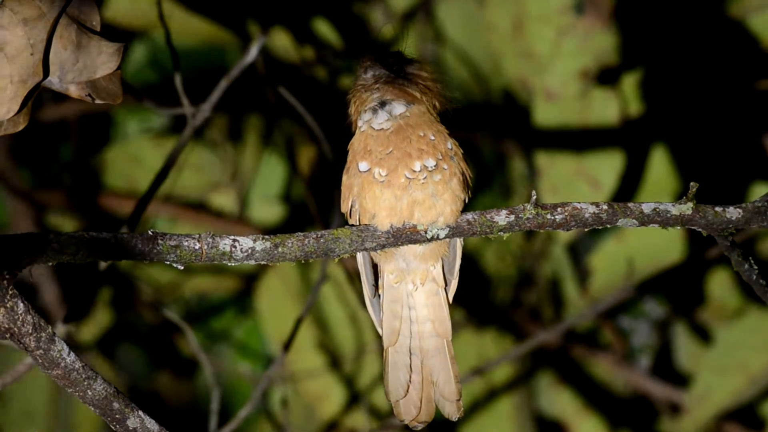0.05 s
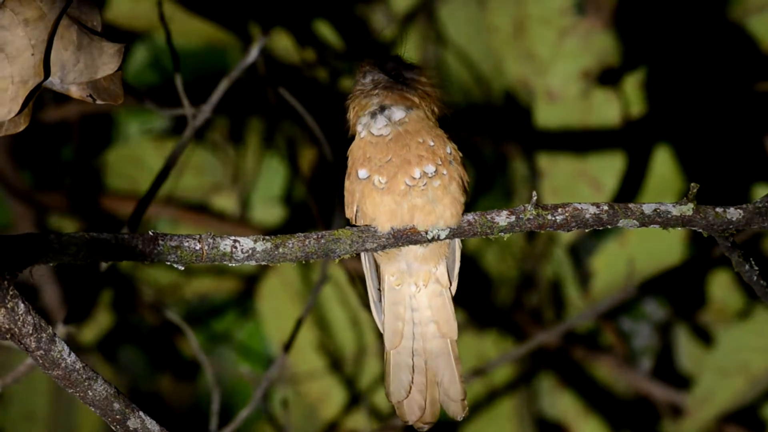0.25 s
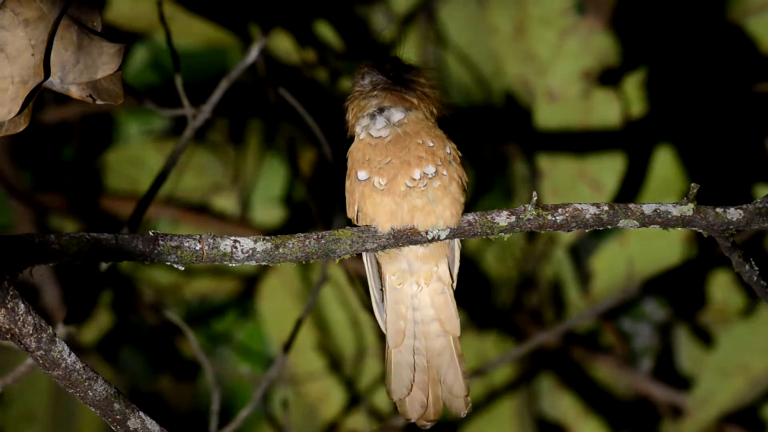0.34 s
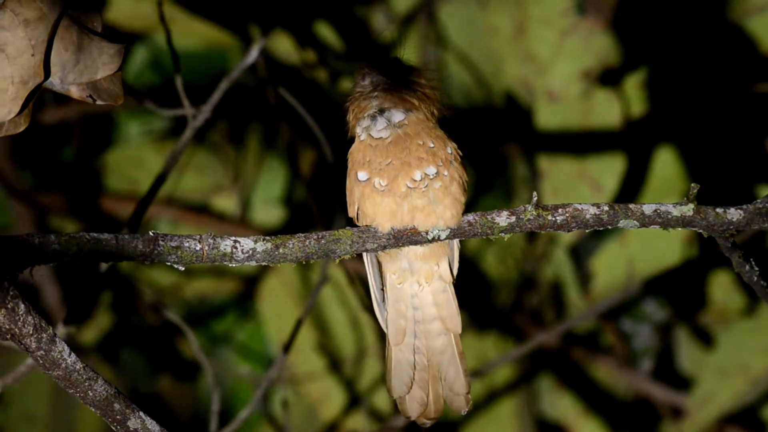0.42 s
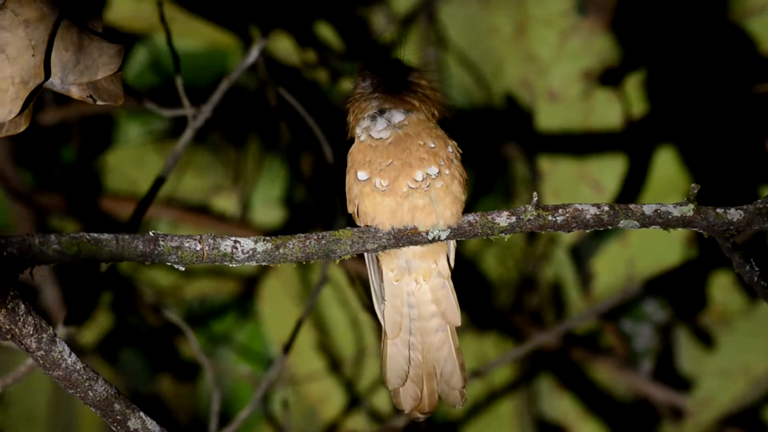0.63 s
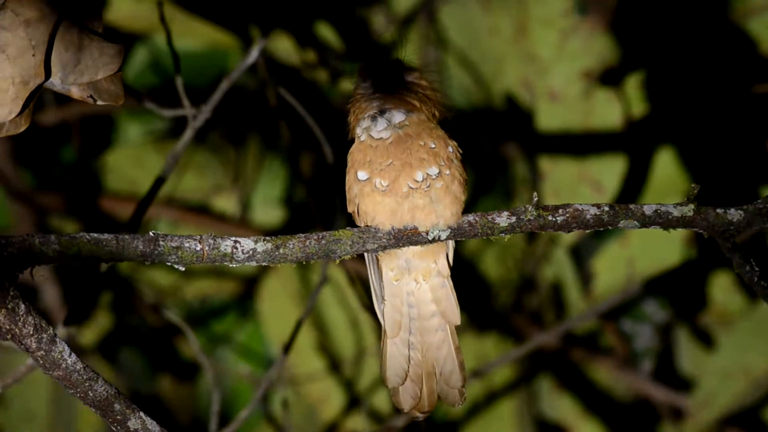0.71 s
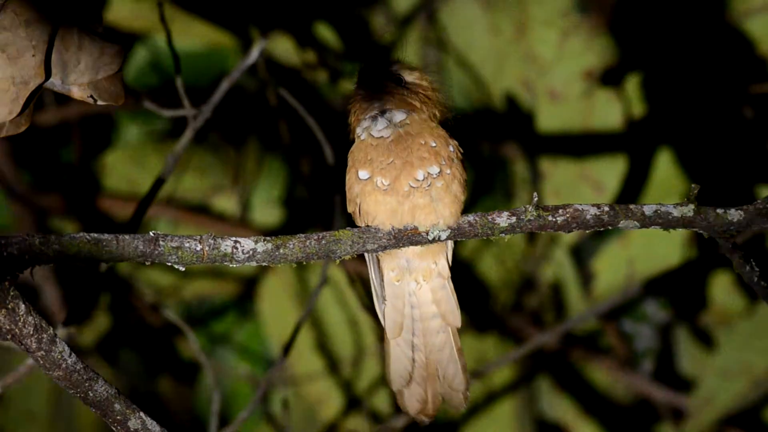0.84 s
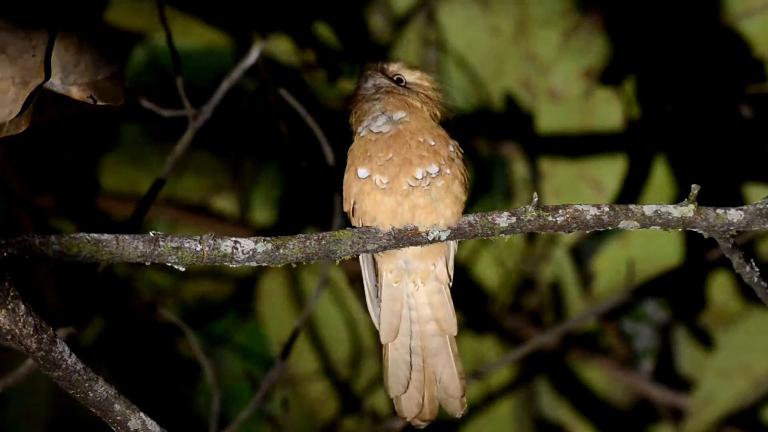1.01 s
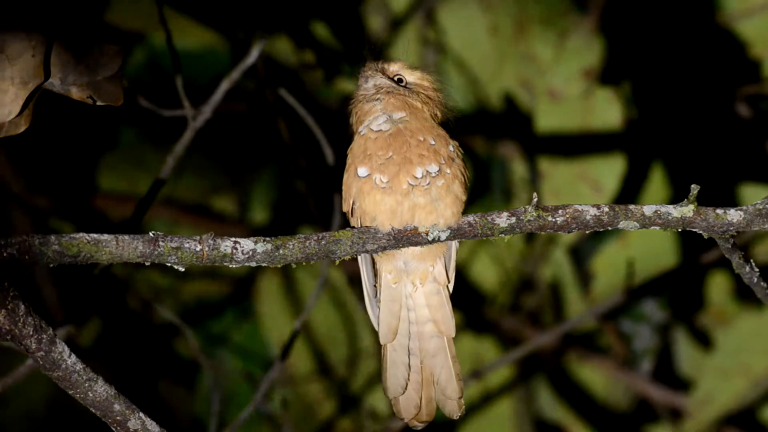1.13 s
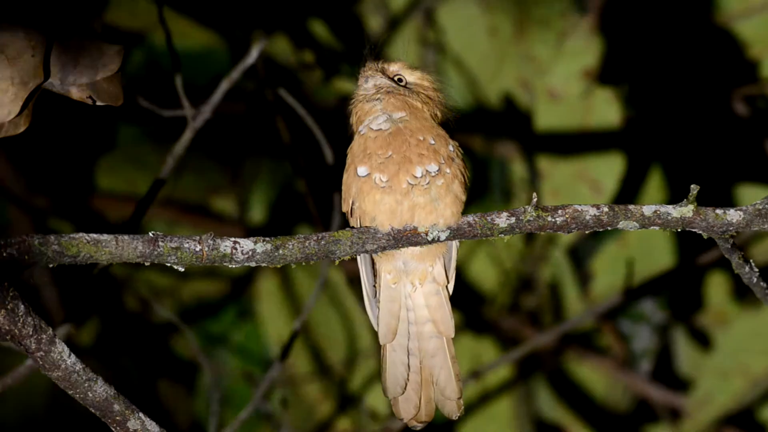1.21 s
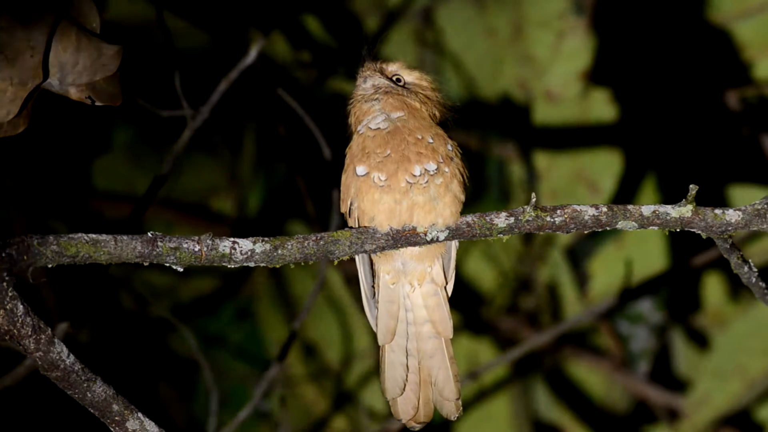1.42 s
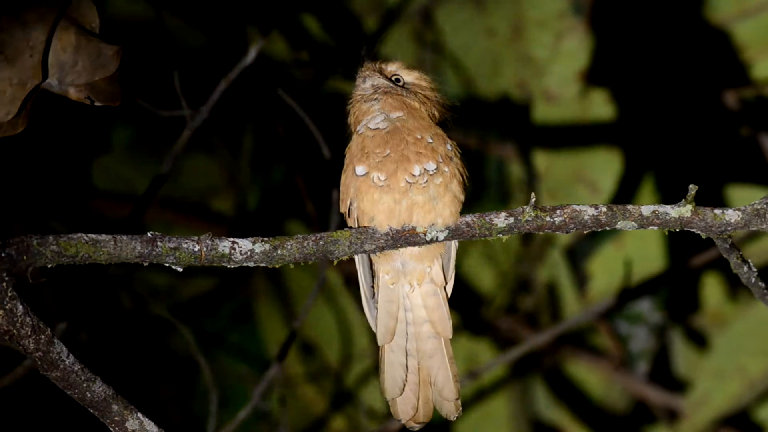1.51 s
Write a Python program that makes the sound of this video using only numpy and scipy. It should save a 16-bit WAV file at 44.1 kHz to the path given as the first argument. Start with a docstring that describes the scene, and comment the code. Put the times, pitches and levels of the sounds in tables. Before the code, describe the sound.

A bird whistles one rising note as a camera shutter clicks, with faint crickets behind.

```python
"""Frogmouth and camera in a night forest

A frogmouth whistles one rising, fluttering note; the trees answer briefly. A camera close by
fires: mirror and shutter clack and rattle in its hollow body. Crickets trill at four pitches
with their wings, a katydid buzzes very high, and leaves tick and rustle over a steady hush."""
import sys
import numpy as np
from scipy import signal
from scipy.fft import rfft, irfft, next_fast_len
from scipy.io import wavfile
from scipy.ndimage import uniform_filter1d, map_coordinates

SR = 44100
rng = np.random.default_rng(int(sys.argv[2]) if len(sys.argv) > 2 else 0)


def file_out(sig):
    """Save sig as 16-bit WAV at sys.argv[1]."""
    # one column per channel
    cols = np.atleast_2d(sig).T
    # limit, then scale
    lim = np.clip(cols, -1, 1)
    pcm = np.round(lim * 32767).astype(np.int16)
    wavfile.write(sys.argv[1], SR, pcm)


N = 68355
T = np.arange(N) / SR


def amp(db):
    """dB to gain."""
    return 10 ** (np.asarray(db) / 20)


def unit(x):
    """Scale to rms 1."""
    return x / np.sqrt(np.mean(x ** 2) + 1e-20)


def db_at(spectrum, hz):
    """Interpolate (frequency [Hz], level [dB]) rows on a log frequency axis."""
    knots_hz, db = np.transpose(spectrum)
    return np.interp(np.log(hz + 1), np.log(knots_hz + 1), db)


def curves(rows):
    """One per-sample curve for each column after the time."""
    times_s, *columns = np.transpose(rows)
    return [np.interp(T, times_s, column) for column in columns]


def wobble(knots_per_s):
    """Smooth random curve, rms near 1."""
    return map_coordinates(rng.standard_normal(int(N * knots_per_s / SR) + 4), [T * knots_per_s])


def filtered(x, response):
    """Apply a complex frequency response."""
    size = next_fast_len(N + SR // 2)
    return irfft(rfft(x, size) * response(np.fft.rfftfreq(size, 1 / SR)), size)[..., :N]


def coloured(x, spectrum):
    """Filter by (frequency [Hz], gain [dB]) rows."""
    return filtered(x, lambda hz: amp(db_at(spectrum, hz)))


def resonance(hz, centre_hz, width_hz):
    """Band-pass response of one mode."""
    return 1j * hz * width_hz / (centre_hz ** 2 - hz ** 2 + 1j * hz * width_hz)


def window(start_s, end_s, edge_s):
    """Gate with linear edges."""
    return np.clip(np.minimum(T - start_s, end_s - T) / edge_s, 0, 1)


def burst(start_s, db, t60_s, rise_s):
    """Noise with a fast rise and exponential decay."""
    age_s = np.maximum(T - start_s, 0)
    return amp(db - 60 * age_s / t60_s) * (1 - np.exp(-age_s / rise_s)) * rng.standard_normal(N)


def hisses(spans, spectrum, edge_s):
    """Stretches of uneven coloured noise."""
    noise = unit(coloured(amp(2.7 * wobble(100)) * rng.standard_normal(N), spectrum))
    return noise * sum(amp(db) * window(a, b, edge_s) for a, b, db in spans)


def tree_echoes(x, t60_s):
    """Scatter off the trees after 8 ms; circular, so steady songs already ring at the start."""
    tail = rng.standard_normal(N) * amp(-60 * T / t60_s) * (T > .008)
    return irfft(rfft(x) * rfft(tail / np.linalg.norm(tail)), N)


def hush():
    """Far leaves, far insects and microphone hiss, faintly patchy."""
    # noise spectrum: (frequency [Hz], relative density [dB])
    spectrum = [(25, -21), (60, -10.5), (150, -4), (350, 0.8), (800, -2.5), (1500, -3.5), (2500, -5.5),
                (4000, -10.5), (5000, -4.5), (5800, -13), (7500, -13), (10000, -25), (13000, -34.5),
                (15000, -30.5), (15800, -37.5)]
    cells = signal.stft(rng.standard_normal(N + 512), nperseg=512)[2]
    patches = uniform_filter1d(rng.standard_normal(cells.shape), size=8, axis=0)
    patch_db = unit(uniform_filter1d(patches, size=12, axis=1))
    noise = signal.istft(cells * amp(patch_db), nperseg=512)[1][:N]
    return amp(-57) * unit(coloured(noise, spectrum))


def cricket(end_hz, db, glide_hz, strokes_per_s, duty, swell_hz, swell_db, scatter_db, octave_db,
            echo_db=-5):
    """Wing strokes as short tone pulses gliding to end_hz, in swells, smeared by the trees."""
    strokes = np.cumsum(strokes_per_s * (1 + .05 * wobble(6))) / SR
    progress = np.clip(strokes % 1 / duty, 0, 1)
    stroke_db = scatter_db * rng.standard_normal(400)[strokes.astype(int)]
    stroke_db += swell_db * np.sin(2 * np.pi * swell_hz / strokes_per_s * strokes + .9 * wobble(8.75))
    hz = end_hz - glide_hz * (1 - progress) ** 2
    phase = 2 * np.pi * np.cumsum(hz) / SR + .7 * wobble(60.19)
    tone = np.sin(phase) + amp(octave_db) * np.sin(2 * phase)
    song = unit(amp(stroke_db) * np.sin(np.pi * progress) * tone)
    return amp(db) * unit(song + amp(echo_db) * tree_echoes(song, t60_s=.2))


def near_cricket():
    """The loudest trill: two wing tones, the lower one weaker."""
    # upper tone at the end of a stroke: (time [s], pitch [Hz])
    pitch = [(0, 5230), (.04, 5330), (.25, 5330), (.37, 5400), (.63, 5400), (.645, 5270), (.7, 5385),
             (1.1, 5380), (1.49, 5240), (1.55, 5410)]
    # upper tone: (time [s], level [dB])
    levels = [(0, -51.5), (.015, -46), (.2, -49.5), (.25, -57.5), (.37, -57), (.45, -56.5), (.63, -57.5),
              (.65, -56.5), (.72, -43), (.79, -44.5), (.83, -53), (.875, -44.5), (.96, -48), (1.03, -59.5),
              (1.1, -73), (1.48, -62.5), (1.5, -48), (1.55, -48)]
    (hz,), (db,) = curves(pitch), curves(levels)
    song = dict(glide_hz=90, strokes_per_s=32, duty=.97,
                swell_hz=70, swell_db=2.5, scatter_db=2.5, octave_db=-36)
    return cricket(hz, db, **song) + cricket(hz - 125, db - 6, **song)


def faint_crickets():
    """Three softer wing trills: one low and steady, one stopping early, one joining late."""
    # late trill: (time [s], level [dB])
    levels = [(.7, -73), (.77, -63.5), (.86, -74), (.95, -60), (1.05, -57), (1.35, -60), (1.5, -84)]
    low = cricket(end_hz=2745, db=-62.5, glide_hz=-60, strokes_per_s=14.8, duty=.98,
                  swell_hz=60, swell_db=3.5, scatter_db=1.5, octave_db=-40)
    early = cricket(end_hz=5015, db=-57.5, glide_hz=40, strokes_per_s=38, duty=.6,
                    swell_hz=7, swell_db=1.2, scatter_db=1.5, octave_db=-40, echo_db=-8)
    late = cricket(end_hz=4760, db=curves(levels)[0], glide_hz=90, strokes_per_s=49, duty=.65,
                   swell_hz=21, swell_db=2.5, scatter_db=3, octave_db=-28)
    return low + early * window(-1, .278, edge_s=.034) + late * window(levels[0][0], 2, edge_s=.067)


def sizzle():
    """A thin hiss near 15 kHz."""
    # hiss stretches: (start [s], end [s], level [dB])
    spans = [(-.1, 0.15, -77), (.27, 0.68, -82.5)]
    # hiss band: (frequency [Hz], relative gain [dB])
    spectrum = [(13500, -30), (14400, -3.5), (15200, -1.2), (15700, -22)]
    return hisses(spans, spectrum, edge_s=.03)


def katydid():
    """Teeth clicking over a scraper ring a high wing mode."""
    # buzzes: (start [s], end [s], level [dB])
    spans = [(0.063, 0.268, -75), (0.654, .81, -77.5), (.905, 1.065, -76), (1.138, 1.427, -78.5)]
    teeth_per_s = 290
    teeth = np.cumsum(teeth_per_s * (1 + .08 * wobble(120))) / SR
    clicks = np.diff(np.floor(teeth), prepend=0) * amp(2 * rng.standard_normal(N))
    wing = unit(filtered(clicks, lambda hz: resonance(hz, centre_hz=14000, width_hz=500) ** 2))
    envelope = sum(amp(db) * window(a, b, edge_s=.01) for a, b, db in spans)
    return unit(wing + tree_echoes(wing, t60_s=.08)) * envelope


def frogmouth():
    """A near-pure tone with a beating neighbour and faint throat-coloured overtones, echoed."""
    # main tone: (time [s], pitch [Hz], level [dB])
    whistle = [(0.185, 1046, -64), (0.201, 996, -47.5), (0.215, 1165, -43.5), (0.231, 1223, -44),
               (0.247, 1223, -36), (0.297, 1320, -36), (0.385, 1417, -30.5), (0.463, 1411, -30.5),
               (0.495, 1364, -33.5), (0.525, 1379, -34), (0.531, 1423, -30), (0.569, 1411, -29),
               (0.685, 1443, -30.5), (0.733, 1495, -37.5), (0.739, 1480, -33.5), (0.781, 1518, -32.5),
               (0.833, 1557, -37.5), (0.843, 1501, -37), (0.855, 1510, -33.5)]
    # weak tone just above it: (time [s], gap [Hz], level re main tone [dB])
    neighbour = [(.2, 50, -20), (.36, 42, -19), (.5, 40, -15), (.6, 44, -15), (.69, 42, -13),
                 (.75, 33, -12), (.85, 45, -15)]
    # overtone envelope: (frequency [Hz], level [dB])
    throat = [(1900, -59), (2300, -54.5), (2800, -63.5), (3300, -70.5), (4200, -62), (4700, -68.5),
              (5600, -74.5), (6300, -72), (6700, -64), (7200, -65), (7800, -79.5), (8500, -81.5),
              (9500, -100)]
    start_s, end_s = whistle[0][0], whistle[-1][0]
    hz, db = curves(whistle)
    gap_hz, neighbour_db = curves(neighbour)
    phase = 2 * np.pi * np.cumsum(hz) / SR
    beat = 2 * np.pi * np.cumsum(gap_hz * (1 + .15 * wobble(8.09))) / SR
    tone = np.sin(phase + .3 * np.cos(beat) + .08 * wobble(150))  # pitch slides with each beat
    tone += amp(neighbour_db + 1.8 * wobble(25)) * np.sin(phase + beat)
    tone *= amp(db + .6 * wobble(120))
    onset = window(start_s, 2, edge_s=.048)
    for k in range(2, 7):
        gain = amp(db_at(throat, k * hz) + 4 * wobble(60)) * onset ** (k - 2)  # higher ones enter later
        tone += gain * np.sin(k * phase + 1.3 * wobble(70))
    end_click = burst(start_s=.8471, db=-33, t60_s=.003, rise_s=.00018)
    call = np.sqrt(2) * tone * window(start_s, end_s, edge_s=.0029)
    call += filtered(end_click, lambda f: 1 / (1 + 1j * f / 3000))  # 3 kHz low-pass
    far_slope = np.roll(tree_echoes(call, t60_s=.08), round(.13 * SR))
    return call + amp(-12) * tree_echoes(call, t60_s=.17) + amp(-28) * far_slope


def leaf_ticks():
    """Tiny dry snaps in the leaves."""
    # snaps: (time [s], level before filtering [dB])
    snaps = [(0.2279, -51), (0.2908, -49), (1.1922, -53)]
    # snap colour: (frequency [Hz], gain [dB])
    spectrum = [(1000, -10), (3000, -14), (7500, 9), (10000, -9), (15000, -16)]
    return coloured(sum(burst(s, db, t60_s=.015, rise_s=.00016) for s, db in snaps), spectrum)


def leaf_rustles():
    """Leaves stir in soft, high hisses."""
    # rustles: (start [s], end [s], level [dB])
    spans = [(.29, .36, -66), (.78, .84, -71), (1.15, 1.31, -68.5)]
    # rustle colour: (frequency [Hz], relative gain [dB])
    spectrum = [(4500, -28), (6500, -1.5), (7800, 8), (9500, -5), (12000, -28)]
    return hisses(spans, spectrum, edge_s=.015)


def camera():
    """Each contact cracks, scrapes and rattles, ringing the hollow body; thin parts quiver on."""
    # mirror and shutter contacts: (time [s], drive level [dB], scrape t60 [s])
    contacts = [(0.3892, -13, 0.013), (0.3977, -28, 0.049), (0.401, -16, 0.027), (0.441, -24.5, 0.027),
                (0.4795, -31, 0.03), (0.4827, -26.5, 0.037), (0.4914, -27, 0.04), (0.508, -15, 0.029),
                (0.5178, -26, 0.027), (0.5361, -26.5, 0.025)]
    # body modes: (frequency [Hz], width [Hz], gain [dB])
    modes = [(594, 180, -4), (1190, 470, -1), (2380, 620, 0.5), (3050, 530, 2.5), (3765, 470, 1),
             (4850, 260, 4.7), (6410, 340, 0.5), (7830, 710, -5), (12000, 5100, -35)]
    # colour of the thin parts: (frequency [Hz], gain [dB])
    thin_parts = [(3000, -20.5), (6000, -2), (9000, 3), (13000, -16.5), (15800, -18)]
    blows = np.zeros(N)
    for s, db, scrape_t60_s in contacts:
        crack = burst(s, db + 7, t60_s=.005, rise_s=.00072)
        scrape = burst(s, db, scrape_t60_s, rise_s=.00072)
        rattle = burst(s, db - 14, t60_s=.11, rise_s=.004)
        blows += crack + scrape + rattle
    body = filtered(blows, lambda hz: sum((-1) ** k * amp(db) * resonance(hz, mode_hz, width_hz)
                                          for k, (mode_hz, width_hz, db) in enumerate(modes)))
    quiver = sum(burst(s, db - 38, t60_s=.33, rise_s=.005) for s, db, _ in contacts)
    return amp(-5) * body + coloured(quiver, thin_parts)


def scene():
    """Mono sum at the microphone."""
    forest = hush() + near_cricket() + faint_crickets() + sizzle() + katydid()
    return (forest + frogmouth() + leaf_ticks() + leaf_rustles() + camera())[None]


def record(dry):
    """Brick-wall low-pass."""
    return filtered(dry, lambda hz: hz < 15830)


dry = scene()
out = record(dry)
file_out(out)
```